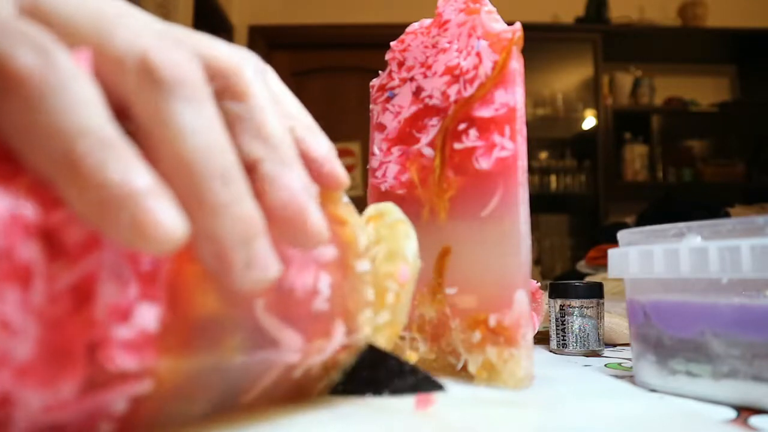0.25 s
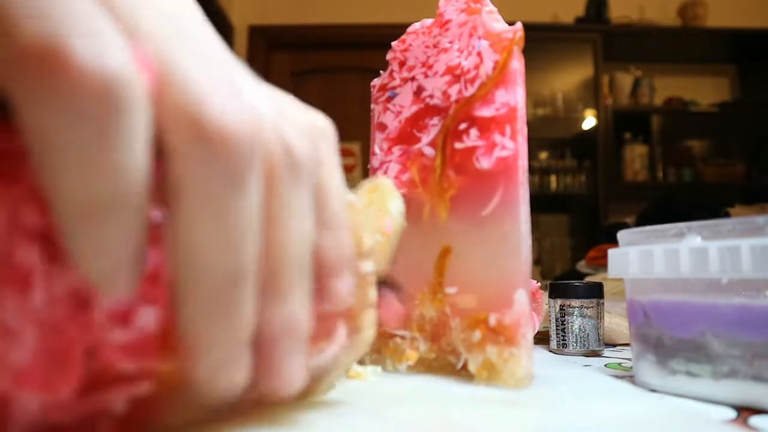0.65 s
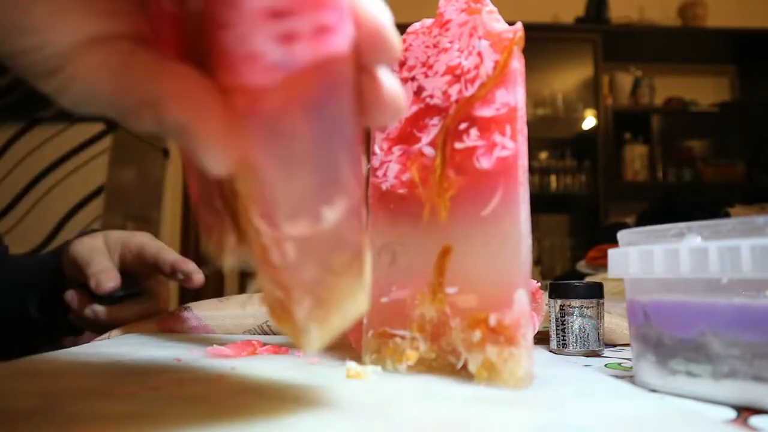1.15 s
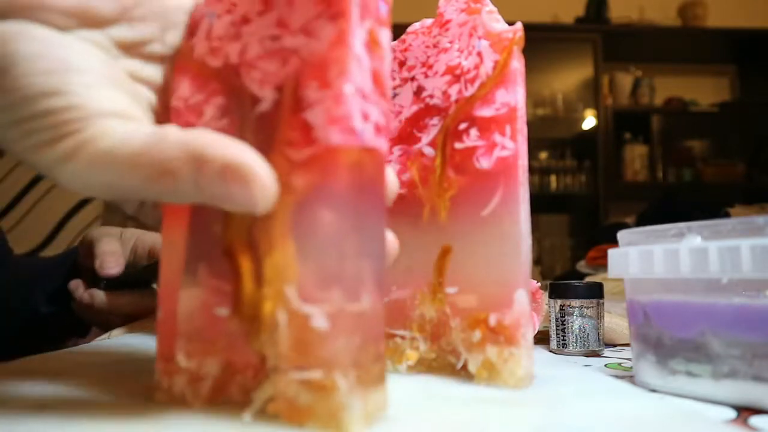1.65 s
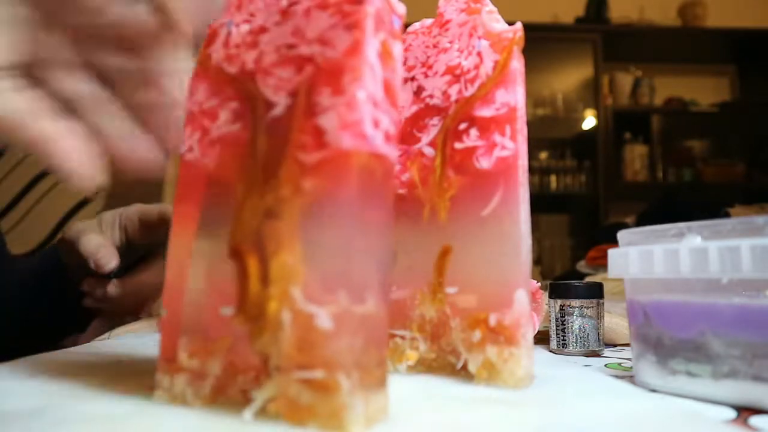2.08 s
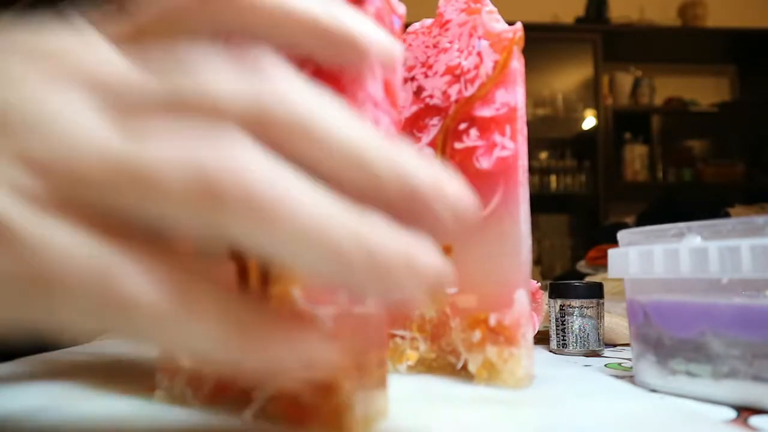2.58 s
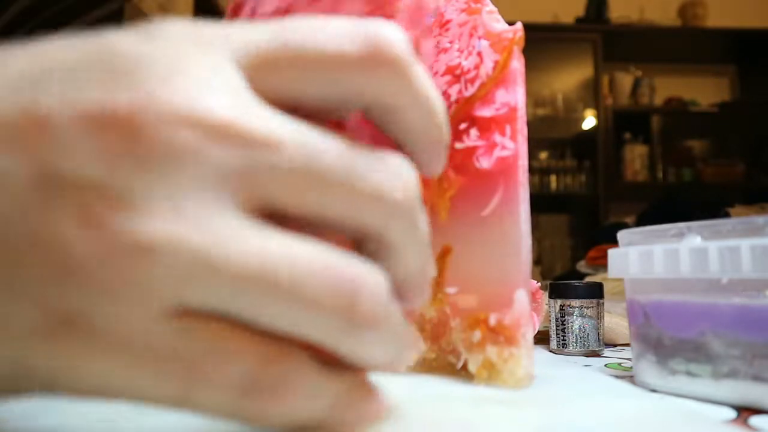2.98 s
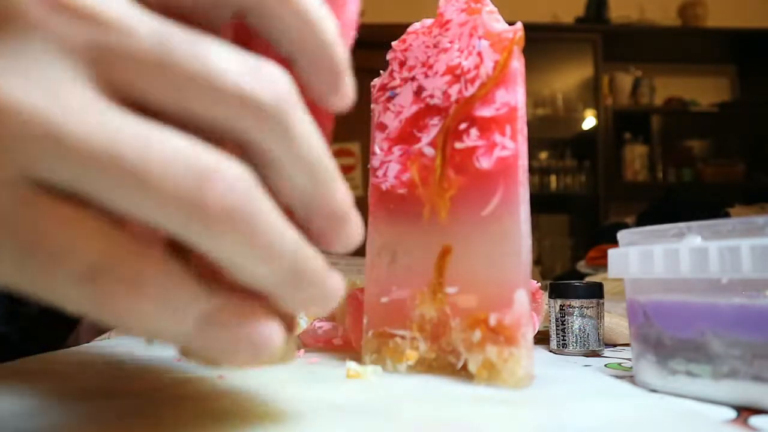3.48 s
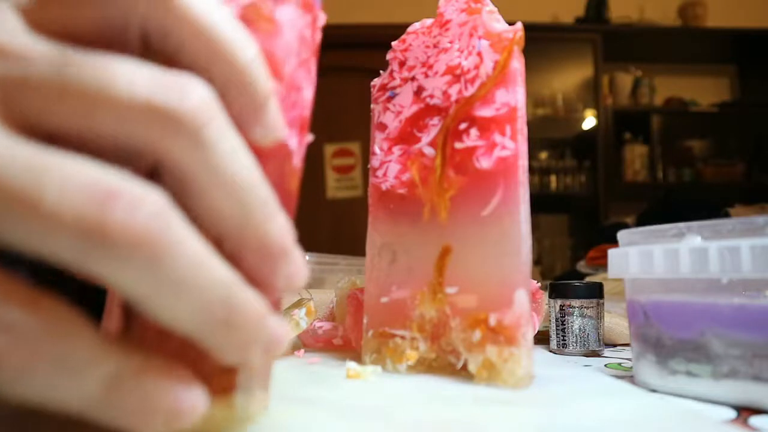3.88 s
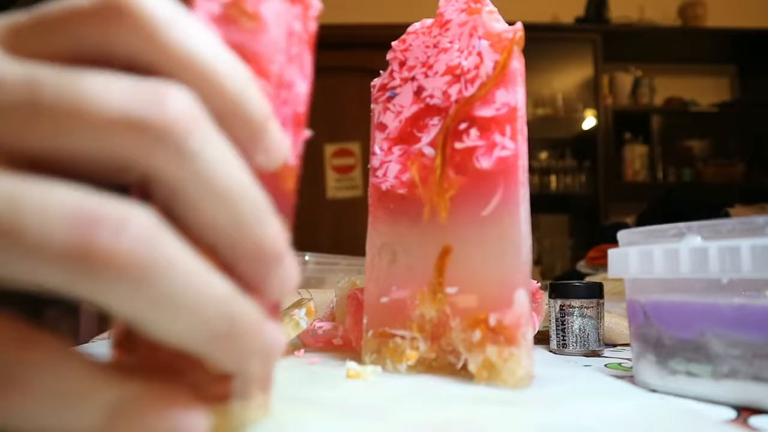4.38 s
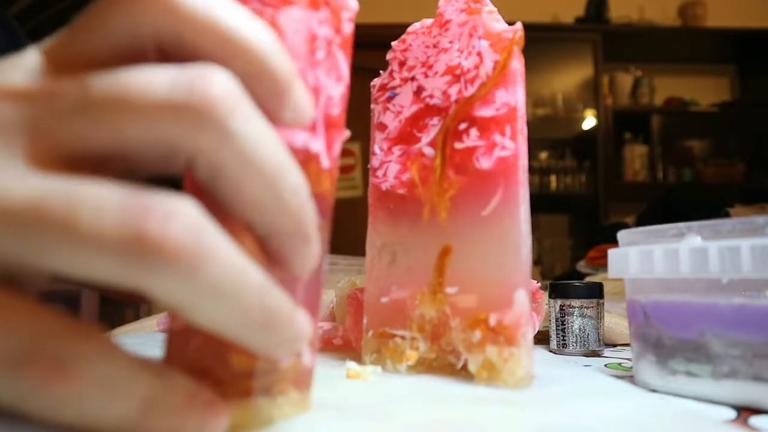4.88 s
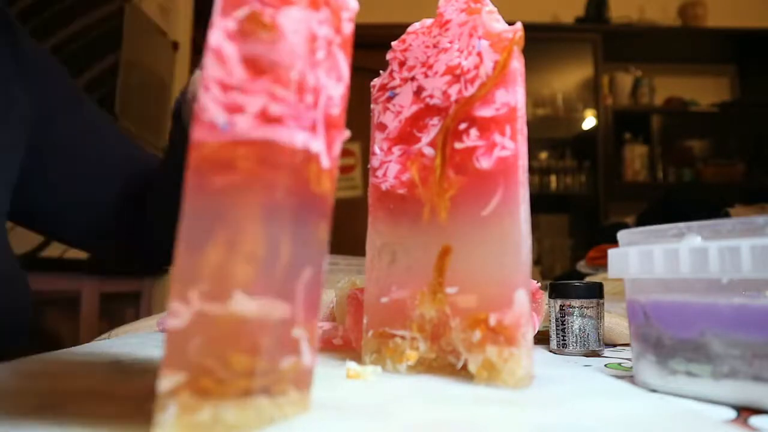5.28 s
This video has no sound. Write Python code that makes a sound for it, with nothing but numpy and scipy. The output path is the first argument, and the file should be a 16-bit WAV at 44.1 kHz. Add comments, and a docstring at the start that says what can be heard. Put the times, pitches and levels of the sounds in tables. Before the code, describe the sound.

A hard block splits under a knife that slams onto a board with one loud crack, then light taps, a clattering blade and a dull thud.

```python
"""Over a humming room, a light tap, then hard soap splits under a knife that slams onto the board, close by.
Gain ducks under the slam's level and creeps back while crumbs snap and the block is stood up; more taps follow.
The knife is laid down, handle first, its blade bouncing and buzzing; the moved block lands with a thud.
Last come soft scuffs and squeaks. Force pulses ring damped modes, noise grains make the rubbing and splitting,
wavering sines the hum and a faint gliding tone, and shaped noise the room."""
import sys
import numpy as np
from scipy import signal
from scipy.fft import rfft, irfft
from scipy.io import wavfile
from scipy.ndimage import uniform_filter1d

SR = 44100
rng = np.random.default_rng(int(sys.argv[2]) if len(sys.argv) > 2 else 0)


def log_audio(samples):
    """Write samples as a 16-bit WAV file to the path given in sys.argv[1]."""
    # one column per channel
    frames = np.atleast_2d(samples).T
    # limit to full scale, then quantise
    limited = np.clip(frames, -1, 1)
    pcm = np.round(limited * 32767).astype(np.int16)
    wavfile.write(sys.argv[1], SR, pcm)


N = 244314

# the blade landing and chattering on the board: (time [s], strength [dB], contact time [s])
SLAMS = [(0.1293, 8.5, 0.00011), (0.1318, -7.5, 0.000183), (0.1336, -11.5, 0.00044),
         (0.1396, -14.5, 0.00057)]
# damped modes of the cutting board: (frequency [Hz], relative level [dB], t60 [s])
BOARD_MODES = [(124, -33, 0.3), (227, -30, 0.16), (470, -24.5, 0.11), (727.5, -17, .03), (967, 0.07, 0.035),
               (1107.5, -3, 0.038), (1274, 3, 0.034), (1655.4, -13.5, 0.1), (2070, -5, 0.025),
               (2460, -6, 0.019), (3294, -6.5, 0.017), (3830, -9, .012), (4660, -22, 0.0081),
               (5600, -12, 0.0064), (8054, -27.5, 0.03)]
# colour of the crack, also sent into the room: (frequency [Hz], relative level [dB per Hz])
CRACK_COLOUR = [(60, -27.5), (120, -13), (230, -10), (320, -13), (445, -1.5), (590, -9.5), (720, 3),
                (1200, -6), (1500, -7), (2150, -10.5), (3300, -23), (5000, -32), (8000, -47), (12000, -79)]


def slam(board_db=-2, crack_db=8, room_db=19, low_cut_hz=95):
    """The blade hits the board: a sharp crack, the board's modes, a few echoes and the room's swelling answer."""
    blows = np.zeros(N)
    for time_s, db, contact_s in SLAMS:
        add(blows, time_s, amp(db) * push(contact_s))
    board = signal.fftconvolve(blows, ring(BOARD_MODES, np.arange(SR // 4) / SR))[:N]
    board = high_pass(board, 2, low_cut_hz)  # too small to radiate deep bass
    crack = np.zeros(N)
    add(crack, SLAMS[0][0], click(read(CRACK_COLOUR, bins(4096))))
    direct = amp(board_db) * board + amp(crack_db) * crack
    answer = amp(room_db) * room(crack, first_wall_s=0.0035, build_s=0.014)
    return aside(near(direct, treble_tilt_db=0.5)) + echoes(direct) + answer


# colour of the splitting soap: (frequency [Hz], relative level [dB per Hz])
SPLIT_COLOUR = [(100, -21), (250, -23), (450, -10.5), (800, -2), (1300, 1.5), (1900, -2.5), (2600, -12),
                (4000, -22), (6000, -33.5), (8500, -37.5), (14000, -50)]


def split(start_s=.1216, level_db=-6.5, swell_db_per_s=1800.5, t60=.028, same=-.55, left_db=-1.5):
    """A rush of tiny fractures swells until the blade lands, then dies; largely opposed at the two ports."""
    t = since(SLAMS[0][0])
    envelope = amp(level_db + np.minimum(swell_db_per_s * t, -60 * t / t60))
    envelope = envelope * (since(start_s) > 0)
    noise = pair(rng.standard_normal((2, N)), same)
    fractures = unit(noise * rng.exponential(1, N)) * envelope
    crackle = signal.oaconvolve(fractures, click(read(SPLIT_COLOUR, bins(1024)))[None])[:, :N]
    return crackle * amp([[left_db], [0]])


# the blade dropping flat and bouncing:
# (time [s], pulse peak [dB], centre before table colour [Hz], push on the table [dB])
BOUNCES = [(2.090, -15, 1510, -35.5), (2.0926, -22, 820, -36.5), (2.1093, -38, 1250, -48),
           (2.1294, -38, 1500, -48), (2.141, -28, 1390, -39), (2.157, -26.5, 1270, -47),
           (2.1621, -31, 840, -39), (2.177, -37.5, 1650, -45), (2.2274, -36, 1420, -49.5),
           (2.2319, -42, 743, -48)]


def blade_bounces():
    """The blade drops flat and bounces: bright short knocks."""
    return knocks(BOUNCES, octaves=0.93, t60=0.013, room_db=-15.5, ring_db=-3)


def blade_buzz(buzz_db=-31.5, t60=0.35, contacts_per_s=900, centre_hz=600, octaves=0.83,
               table_db=-22, room_db=-10):
    """Each bounce leaves the blade buzzing against the table top, which rumbles along."""
    level = np.zeros(N)
    for time_s, db, *_ in BOUNCES:
        t = since(time_s)
        level += amp(db + buzz_db - 60 * abs(t) / t60) * (t > 0)
    contacts = rng.standard_normal(N) * (rng.random(N) < contacts_per_s / SR)
    contacts = unit(contacts) * level
    buzz = signal.oaconvolve(contacts, contact(centre_hz, octaves))[:N]
    rumble = signal.oaconvolve(contacts, ring(TABLE_MODES, np.arange(SR // 4) / SR))[:N]
    return in_room(buzz + amp(table_db) * rumble, room_db)


# the knife's handle bumping down: (time [s], pulse peak [dB], centre before table colour [Hz])
BUMPS = [(1.9984, -31.5, 397), (2.013, -32, 360), (2.025, -32, 180)]


def handle_bumps():
    """The handle comes down first: duller knocks with a longer ring."""
    return knocks(BUMPS, octaves=1, t60=0.073, room_db=-1.5, ring_db=-1.5)


# the block stood up, landing and settling, and the bouncing blade knocking the table near 2.1-2.3 s: # (time
# [s], level [dB], contact time [s], push on the legs [dB])
THUDS = [(.615, -46, 0.0022, -79), (0.685, -50.5, 0.00402, -80), (1.423, -43, 0.01, -44.5),
         (1.45, -45.5, 0.0047, -64), (1.555, -49, 0.0037, -52.5), (1.783, -47, 0.0046, -56),
         (2.12, -41, 0.0018, -73), (2.153, -42, 0.0029, -76), (2.233, -38, 0.0028, -73),
         (2.248, -41, 0.0025, -70), (2.274, -52, 0.0018, -70), (3.8617, -28, 0.0037, -40),
         (3.8697, -30, 0.0066, -68), (3.891, -23.5, 0.0093, -59), (3.934, -42.5, 0.0035, -68),
         (4.10, -64, 0.015, -50.5), (4.60, -60, .01, -56)]
# damped modes of the table top: (frequency [Hz], relative level [dB], t60 [s])
TABLE_MODES = [(55, -6.5, 0.13), (77.7, -12.5, 0.33), (118.7, 0, 0.18), (143.6, -3, 0.13),
               (186.3, 0.5, 0.085), (220, -1.5, 0.12), (325.5, -1, 0.033), (454.9, 5.5, 0.044)]
# the table rocking on its legs: (frequency [Hz], relative level [dB], t60 [s])
ROCKING_MODES = [(37.46, -7.5, 1.98), (48.6, 6.5, 0.41)]


def thuds(room_db=-17, low_cut_hz=70, bounce_contact_s=0.0012):
    """Block and blade ring the top, duller the longer they push; each push on the legs also rocks the table."""
    force, shove, t = np.zeros(N), np.zeros(N), np.arange(SR) / SR
    for time_s, db, contact_s, legs_db in THUDS:
        add(force, time_s, amp(db) * push(contact_s))
        add(shove, time_s, amp(legs_db) * push(contact_s))
    for time_s, _, _, push_db in BOUNCES:
        add(force, time_s, amp(push_db) * push(bounce_contact_s))
    top = signal.fftconvolve(force, ring(TABLE_MODES, t))[:N]
    top = high_pass(top, 2, low_cut_hz)  # a panel radiates little deep bass
    rocking = signal.fftconvolve(shove, ring(ROCKING_MODES, t))[:N]
    return near(top + rocking) + amp(room_db) * room(top)


# light taps of soap and knife on the table: (time [s], pulse peak [dB],
# centre before table colour [Hz], push on the board [dB], push on the blade [dB])
TAPS = [(.0399, -37.5, 2760, -70.5, -53), (.62, -42.5, 803, -66.5, -70), (.754, -47, 2940, -70, -58),
        (1.2186, -42, 1595, -58, -65), (1.227, -50, 2084, -73, -62), (1.3182, -34, 1645, -55, -42),
        (1.3221, -34, 1170, -61, -40), (1.3265, -36, 990, -47, -53), (1.4508, -37.5, 1390, -50, -55),
        (1.6310, -23, 2280, -51, -42.5), (1.6341, -29.5, 1246, -43, -62), (1.642, -50, 3000, -58, -62),
        (1.7125, -51, 1800, -70, -65), (2.7589, -43, 1897, -65, -62), (2.9154, -38.5, 1360, -64, -69),
        (4.033, -50.5, 1400, -68, -71), (4.2228, -48.5, 1400, -60, -70), (4.388, -48, 1300, -67, -63),
        (4.394, -54, 1600, -74, -62)]
# modes of the blade, damped by the hand: (frequency [Hz], relative level [dB], t60 [s])
BLADE_MODES = [(1130, -2.5, .045), (1580, -1.5, .025), (1980, -0.5, 0.017), (2400, -1, .018),
               (3400, 0.5, 0.013)]


def taps(board_contact_s=0.00044, blade_contact_s=0.00041, room_db=-9, echo_db=-1):
    """Small, bright contacts of soap and knife; each leaves the board and the blade ringing briefly."""
    on_board, on_blade, t = np.zeros(N), np.zeros(N), np.arange(SR // 4) / SR
    for time_s, _, _, board_db, blade_db in TAPS:
        add(on_board, time_s, amp(board_db) * push(board_contact_s))
        add(on_blade, time_s, amp(blade_db) * push(blade_contact_s))
    board = signal.oaconvolve(on_board, ring(BOARD_MODES, t))[:N]
    blade = signal.oaconvolve(on_blade, ring(BLADE_MODES, t))[:N]
    ringing = board + blade
    contacts = knocks(TAPS, octaves=1.125, t60=0.017, room_db=-15.5, ring_db=-4)
    return contacts + in_room(ringing, room_db) + amp(echo_db) * echoes(ringing)


# crumbs of soap snapping off: (time [s], peak on the left [dB])
CRUMBS = [(0.384, -36.5), (0.429, -43), (0.437, -48), (.674, -44), (0.696, -48.5), (0.772, -42.5)]


def crumbs(centre_hz=6900, octaves=0.25, t60=0.014, right_db=-7):
    """Tiny bright snaps of decaying noise just in front of the left port."""
    out, t = np.zeros((2, N)), np.arange(1024) / SR
    colour = click(hump(bins(1024), centre_hz, octaves))[None]
    for time_s, db in CRUMBS:
        grit = rng.standard_normal((2, len(t))) * amp(-60 * t / t60)
        tick = signal.fftconvolve(grit, colour)
        tick = tick / abs(tick).max(axis=None)
        add(out, time_s, amp(db) * tick)
    return out * amp([[0], [right_db]])


# soap sticking and slipping on the table:
# (mid-stroke time [s], level [dB], rough length at half height [s], mean pitch [Hz])
SQUEAKS = [(4.2245, -51, 0.005, 1650), (4.29, -57, 0.0092, 1250), (4.293, -57, 0.011, 750),
           (4.306, -62, 0.014, 3400), (4.39, -60, .01, 1251), (4.612, -56, .016, 1285),
           (4.614, -65, 0.008, 3450), (4.913, -62, 0.012, 1647)]


def squeaks(jitter=0.126, jitter_hz=450, room_db=-9):
    """A quick run of slips makes a short tone of unsteady pitch."""
    out, wander = np.zeros(N), drift(jitter_hz)
    for time_s, db, length_s, hz in SQUEAKS:
        stroke = stroke_shape(length_s)
        pitch = hz * (1 + jitter * wander[round(time_s * SR):][:len(stroke)])
        tone = unit(np.sin(2 * np.pi * np.cumsum(pitch) / SR))
        add(out, time_s - 3 * length_s / 2, amp(db) * stroke * tone)
    return in_room(out, room_db)


# blade, fingers, sleeve and soap rubbing; a stroke due to begin before zero begins at zero:
# (mid-stroke time [s], level [dB], rough length at half height [s], centre [Hz])
SCUFFS = [(.085, -48.5, 0.092, 1140), (0.679, -60.5, 0.085, 1230), (0.879, -63, 0.0728, 445.6),
          (1.405, -65, 0.096, 1394), (1.779, -62.5, 0.0375, 1100), (2.9, -66.5, 0.064, 1605),
          (3.87, -55, .02, 1400), (3.869, -62, .014, 3980), (4.292, -57.5, 0.032, 1590),
          (4.488, -73, 0.09, 5150), (4.613, -62, 0.0307, 1310), (4.873, -61, 0.07, 390),
          (4.945, -64, .06, 521), (4.897, -69.5, 0.12, 2000)]


def scuffs(room_db=-9, octaves=0.92):
    """Many small slips under each short stroke."""
    out = np.zeros(N)
    for time_s, db, length_s, hz in SCUFFS:
        stroke = stroke_shape(length_s)
        slips = grains(len(stroke), per_s=1300, centre_hz=hz, octaves=octaves)
        add(out, time_s - 3 * length_s / 2, amp(db) * stroke * slips)
    return in_room(out, room_db)


# a faint tone somewhere in the room: (start time [s], length [s], level [dB])
GLIDES = [(-.03, .17, -57.5), (1.31, .32, -56.5)]


def glide(end_hz=312, top_hz=379, fade_s=.025, room_db=-8):
    """A soft, nearly pure tone whose pitch rises and falls in one arch."""
    out = np.zeros(N)
    for start_s, length_s, db in GLIDES:
        t = np.clip(since(start_s), 0, length_s)
        hz = end_hz + (top_hz - end_hz) * np.sin(np.pi * t / length_s)
        fade = np.minimum(np.minimum(t, length_s - t) / fade_s, 1)
        out += amp(db) * fade * np.sin(2 * np.pi * np.cumsum(hz) / SR)
    return in_room(out, room_db)


# lines of the appliance hum: (frequency [Hz], rms level [dB])
HUM_LINES = [(48.4, -71.5), (96.9, -69.5), (294.5, -65), (590, -67), (638, -72), (883, -78.5)]


def hum(waver_hz=2.9, flutter_db=1.5, swell_db=0.6):
    """An appliance motor: a few wavering lines that swell and sink, the higher ones less steady."""
    out = np.zeros(N)
    for hz, db in HUM_LINES:
        waver = waver_hz * np.sqrt(hz / HUM_LINES[2][0]) * drift(5.5)  # waver_hz holds for the third line
        turns = np.cumsum(hz + waver) / SR
        level = amp(flutter_db * drift(8.4) + swell_db * drift(1.5))
        out += amp(db) * unit(np.sin(2 * np.pi * turns) * level)
    return near(out)


# colour of the room noise: (frequency [Hz], relative level [dB per Hz])
AIR_COLOUR = [(15, -42), (28, -19.5), (48, -2), (69, -16), (100, -11), (160, -7), (300, -7), (450, -10.5),
              (600, -10.5), (800, -16.5), (1850, -18.5), (7000, -27.5), (13200, -29.5), (15500, -47.5)]
# broad resonances on top of it: (frequency [Hz], full width at 1/e of the dB lift [Hz], lift [dB])
AIR_PEAKS = [(670, 300, 1.5), (1760, 530, 4), (3420, 430, 2.5), (13251, 590, 12.5)]
# its left-right likeness: (frequency [Hz], correlation [-1 to 1])
AIR_LIKENESS = [(60, 0.96), (150, 0.32), (400, 0.37), (950, 0.12), (2200, .2), (4200, -0.32), (8500, -0.46),
                (14000, -0.8)]


def air(level_db=-57, swell_db=0.09):
    """Gently uneven room noise and hiss with a few broad resonances."""
    hz = bins(N)
    colour_db = read(AIR_COLOUR, hz)
    for centre_hz, width_hz, db in AIR_PEAKS:
        colour_db = colour_db + db * np.exp(-(2 * (hz - centre_hz) / width_hz) ** 2)
    spectra = pair(rfft(rng.standard_normal((2, N))), read(AIR_LIKENESS, hz))
    noise = irfft(spectra * amp(colour_db), N)
    return amp(level_db + swell_db * drift(3)) * unit(uneven(noise))


# decay of the room: (frequency [Hz], t60 [s])
ROOM_T60 = [(100, 0.34), (350, 0.68), (700, .52), (1200, 0.62), (2200, 0.58), (4000, 0.6), (8000, 0.46),
            (14000, .2)]
# left-right likeness of the room: (frequency [Hz], correlation [-1 to 1])
ROOM_LIKENESS = [(100, 1), (1000, 0.9733), (2200, .92), (4200, 0.36), (8000, .2)]


def room(x, first_wall_s=.008, build_s=0.0023, patchy_db=1.5):
    """Dense reflections that build up, then die band by band in uneven clumps."""
    hz, t, z = signal.stft(rng.standard_normal((2, SR)), SR, nperseg=256)
    clumps = uniform_filter1d(rng.standard_normal(z.shape[1:]), size=4, axis=0)
    clumps = unit(uniform_filter1d(clumps, size=4, axis=1))
    decay_db = -60 * t / read(ROOM_T60, hz)[:, None]
    z = pair(z, read(ROOM_LIKENESS, hz)[:, None]) * amp(patchy_db * clumps + decay_db)
    tail = signal.istft(z, SR, nperseg=256)[1]
    tail = tail * np.clip((np.arange(tail.shape[1]) / SR - first_wall_s) / build_s, 0, 1)
    return signal.fftconvolve(x[None], tail / np.linalg.norm(tail[0]), axes=1)[:, :N]


# nearby walls and furniture throwing sound back: (delay [s], level [dB])
ECHOES = [(.020, -25.5), (.025, -22.5), (.038, -21.5), (0.0417, -21), (.057, -21.5), (.083, -26.5)]


def echoes(x, top_hz=3500):
    """A few single reflections, duller than the direct sound."""
    out, dulled = np.zeros(N), low_pass(x, top_hz)
    for delay_s, db in ECHOES:
        add(out, delay_s, amp(db) * dulled)
    return out


# the angle by which the slam lags at the left port: (frequency [Hz], phase [rad])
SLAM_LAG = [(170, .1), (450, 0.73), (850, 0.27), (1250, 0.87), (1800, 1.45), (2800, .45), (6000, .25),
            (8500, 1.4), (12000, .2)]


def aside(x):
    """A broad source off to one side: the left port hears it a little later."""
    half_turn = .5j * read(SLAM_LAG, bins(N)) * np.array([[-1], [1]])
    return irfft(rfft(x) * np.exp(half_turn), N)


# the angle by which the left port leads: (frequency [Hz], phase [rad])
PORT_PHASE = [(70, .01), (150, .05), (350, .2), (1000, 0.13), (5000, .16)]


def microphone(x, low_cut_hz=30):
    """Two close capsules, slightly out of phase, deaf to the deepest bass."""
    half_turn = .5j * read(PORT_PHASE, bins(N)) * np.array([[1], [-1]])
    return high_pass(irfft(rfft(x) * np.exp(half_turn), N), 3, low_cut_hz)


# how the table colours a knock: (frequency [Hz], gain [dB])
SURFACE_COLOUR = [(100, -2.5), (330, 3), (620, 3.5), (870, 6.5), (1080, 1.5), (1320, 0), (1750, 2),
                  (2500, -5), (3500, -2.5), (4600, -7.5), (7000, -10.5)]


def contact(centre_hz, octaves):
    """The pulse of one contact, coloured by its hardness and by the table."""
    hz = bins(4096)
    return click(hump(hz, centre_hz, octaves, slope_db=40.5) + read(SURFACE_COLOUR, hz))


def knocks(rows, octaves, t60, room_db, ring_db):
    """Each contact is a pulse followed by a short dense ring."""
    out, t = np.zeros(N), np.arange(4096) / SR
    for time_s, db, hz, *_ in rows:
        pulse = contact(hz, octaves)
        tail = rng.standard_normal(len(t)) * amp(-60 * t / t60)
        tail = tail * np.minimum(t * hz / 2, 1)  # builds over two periods
        tail = signal.fftconvolve(tail, pulse)[:len(t)]
        knock = pulse + amp(ring_db) * tail / np.linalg.norm(tail)
        add(out, time_s, amp(db) * knock / abs(pulse).max())
    return in_room(out, room_db)


def push(contact_s):
    """A smooth force pulse of area 1."""
    force = np.sin(np.pi * np.minimum(np.arange(2048) / SR / contact_s, 1)) ** 2
    return force / force.sum()


def ring(modes, t):
    """Damped sines of a struck object."""
    return sum(amp(db - 60 * t / t60) * np.sin(2 * np.pi * hz * t) for hz, db, t60 in modes)


def grains(size, per_s, centre_hz, octaves):
    """A random train of tiny contacts of one colour, rms 1."""
    hits = rng.standard_normal(size) * (rng.random(size) < per_s / SR)
    return unit(signal.oaconvolve(hits, click(hump(bins(1024), centre_hz, octaves)))[:size])


def stroke_shape(length_s):
    """The smooth swell and fall of one rubbing stroke, its skirts three lengths wide."""
    return signal.windows.hann(round(3 * length_s * SR)) ** 2


def click(gain_db):
    """The shortest causal pulse with this spectrum (minimum phase), of energy 1."""
    log_gain = np.log(amp(np.maximum(gain_db - gain_db.max(), -90)))
    mirrored = np.r_[log_gain, log_gain[-2:0:-1]]
    pulse = np.fft.ifft(np.exp(np.conj(signal.hilbert(mirrored)))).real
    return pulse / np.linalg.norm(pulse)


def hump(hz, centre_hz, octaves, slope_db=13):
    """A round-topped spectral hill with straight flanks, in dB."""
    return -slope_db * (np.sqrt(1 + (np.log2((hz + 1) / centre_hz) / octaves) ** 2) - 1)


def near(x, treble_tilt_db=1):
    """A close source at two microphone ports: a little more treble on the left."""
    hz = bins(N)
    lean = amp(treble_tilt_db * hz ** 2 / (hz ** 2 + 3500 ** 2))
    return irfft(rfft(x) * np.array([lean, 1 / lean]), N)


def in_room(x, room_db):
    """A close source plus its reflections."""
    return near(x) + amp(room_db) * room(x)


def pair(z, same):
    """Two unrelated signals or spectra become left and right with the given likeness."""
    same = np.clip(same, -1, 1)
    mid, side = np.sqrt((1 + same) / 2) * z[0], np.sqrt((1 - same) / 2) * z[1]
    return np.array([mid + side, mid - side])


def uneven(x, patchy_db=1.3, patch_s=.09, patch_hz=350):
    """Small patches of the spectrum swell and sink on their own."""
    hz, t, z = signal.stft(x, SR, nperseg=1024)
    field = rng.standard_normal(z.shape[1:])
    field = uniform_filter1d(field, size=max(round(patch_hz / hz[1]), 1), axis=0)
    field = unit(uniform_filter1d(field, size=max(round(patch_s / t[1]), 1), axis=1))
    return signal.istft(z * amp(patchy_db * field), SR, nperseg=1024)[1][:, :N]


def drift(rate_hz):
    """Slow random wander of rms 1."""
    return unit(irfft(rfft(rng.standard_normal(N)) * np.exp(-(bins(N) / rate_hz) ** 2), N))


def high_pass(x, order, hz):
    """Remove the bass below hz."""
    return signal.sosfilt(signal.butter(order, hz, "high", fs=SR, output="sos"), x)


def low_pass(x, hz):
    """Roll off the treble above hz, second order."""
    return signal.sosfilt(signal.butter(2, hz, fs=SR, output="sos"), x)


def amp(db):
    """Decibels to amplitude."""
    return 10 ** (np.asarray(db) / 20)


def unit(x):
    """Scale to rms 1."""
    return x / np.sqrt(np.mean(x ** 2) + 1e-20)


def read(points, hz):
    """Join a table of (frequency [Hz], value) on a log-frequency axis."""
    f, value = np.transpose(points)
    return np.interp(np.log(hz + 1), np.log(f + 1), value)


def add(mix, time_s, sound):
    """Lay a sound into the mix at time_s, or at zero if that is earlier than the start."""
    part = mix[..., max(round(time_s * SR), 0):][..., :sound.shape[-1]]
    part += sound[..., :part.shape[-1]]


def bins(size):
    """Frequencies of a real spectrum, in Hz."""
    return np.fft.rfftfreq(size, 1 / SR)


def since(time_s):
    """Seconds from the moment time_s, for every sample."""
    return np.arange(N) / SR - time_s


def scene():
    """All sources summed at the two capsules."""
    knife = slam() + split() + blade_bounces() + blade_buzz() + handle_bumps()
    soap = thuds() + taps() + crumbs() + squeaks() + scuffs()
    background = glide() + hum() + air()
    return microphone(knife + soap + background)


def record(dry, threshold_db=-14, share=0.6, held_fall_db_per_s=17, smooth_s=0.012,
           treble_hz=9000, edge_hz=15700):
    """Gain ducks by a share of the held excess level and creeps back; peaks saturate; treble rolls off."""
    power = abs(uniform_filter1d((dry ** 2).mean(0), size=400))
    power_db = 10 * np.log10(power + 1e-12)
    fall_db = np.arange(N) / SR * held_fall_db_per_s
    held_db = np.maximum.accumulate(power_db + fall_db) - fall_db  # peaks held, sinking steadily
    over_db = np.maximum(held_db - threshold_db, 0)
    keep = np.exp(-1 / (smooth_s * SR))
    ducked = dry * amp(-share * signal.lfilter([1 - keep], [1, -keep], over_db))
    clipped = ducked / (1 + ducked ** 4) ** (1 / 4)
    dulled = low_pass(clipped, treble_hz)
    steep_edge = signal.firwin(255, edge_hz, window=("kaiser", 9), fs=SR)
    return signal.oaconvolve(dulled, steep_edge[None], "same")


dry = scene()
out = record(dry)
log_audio(out)
```